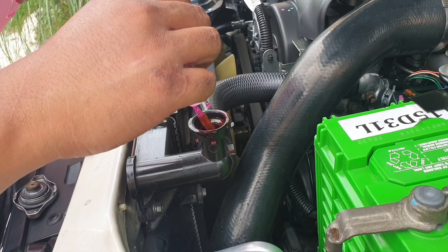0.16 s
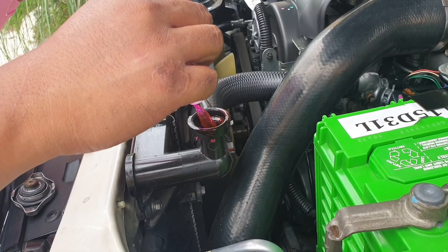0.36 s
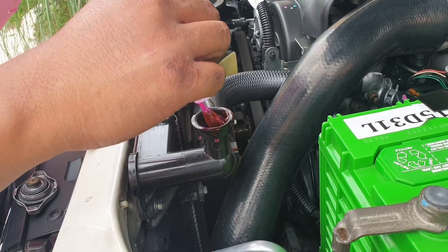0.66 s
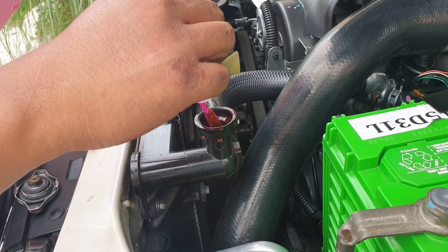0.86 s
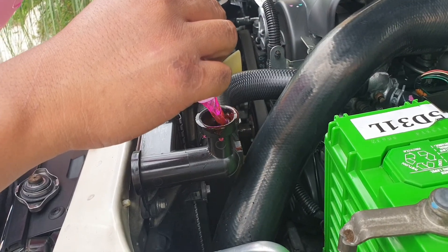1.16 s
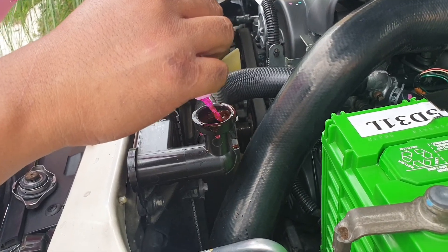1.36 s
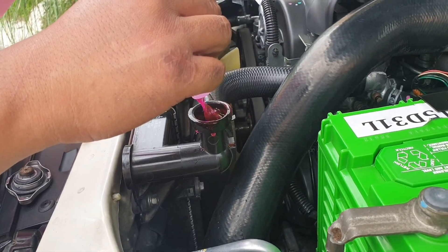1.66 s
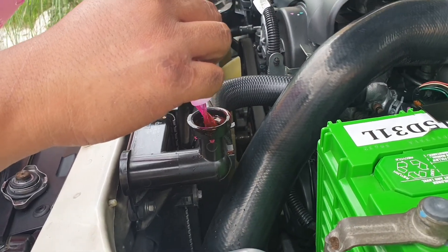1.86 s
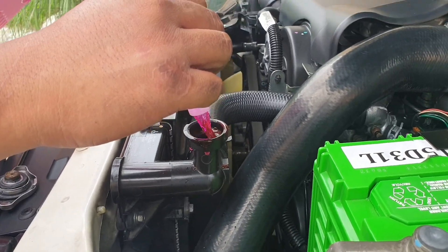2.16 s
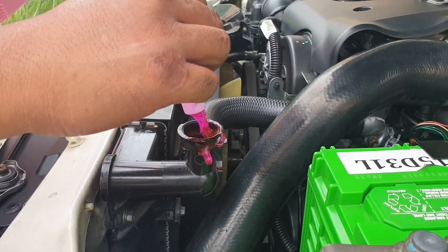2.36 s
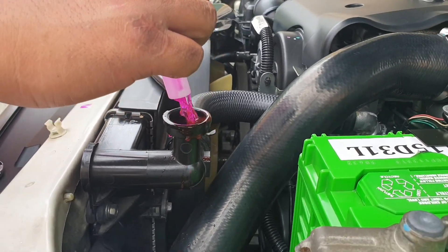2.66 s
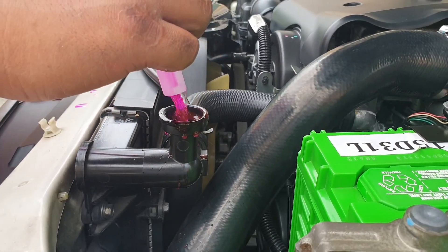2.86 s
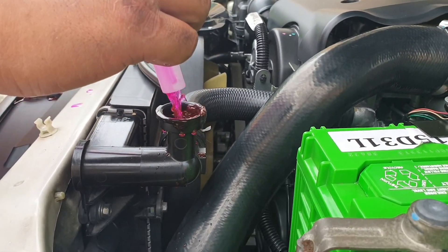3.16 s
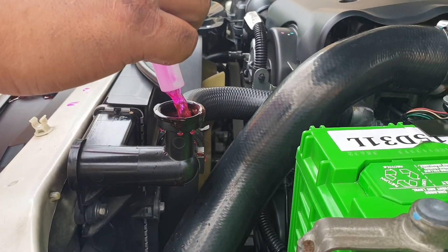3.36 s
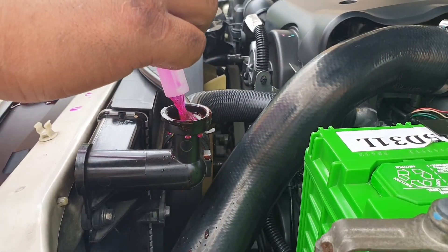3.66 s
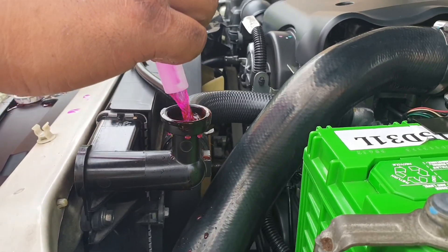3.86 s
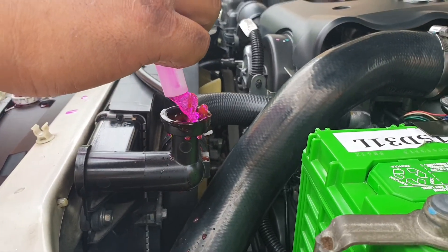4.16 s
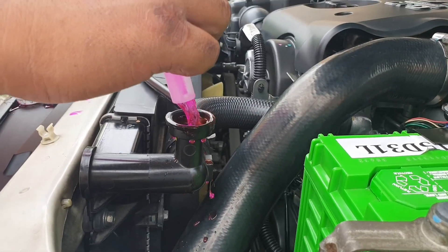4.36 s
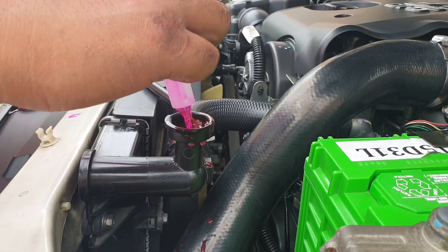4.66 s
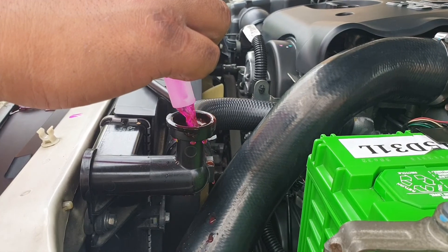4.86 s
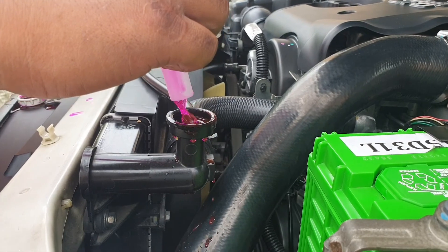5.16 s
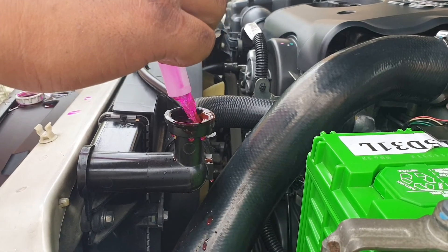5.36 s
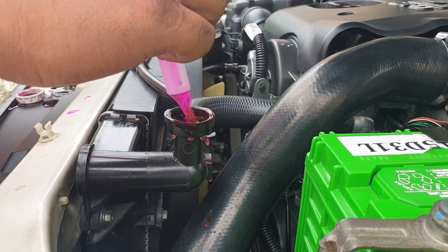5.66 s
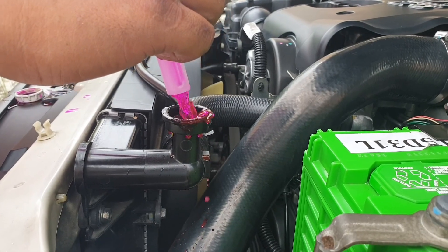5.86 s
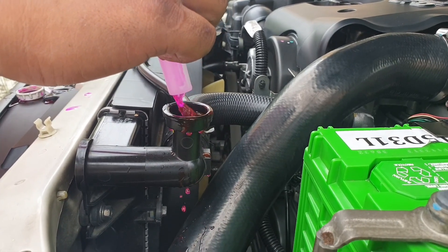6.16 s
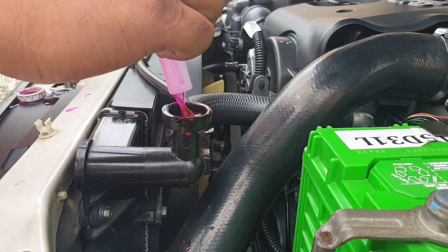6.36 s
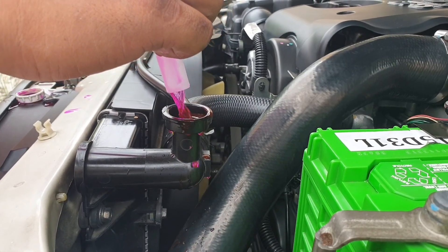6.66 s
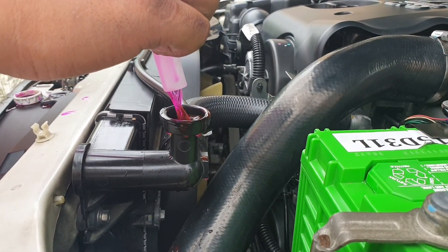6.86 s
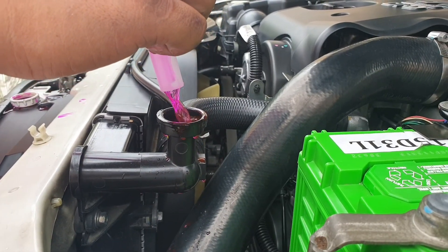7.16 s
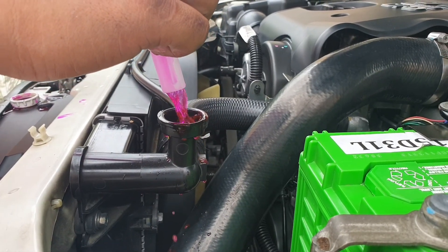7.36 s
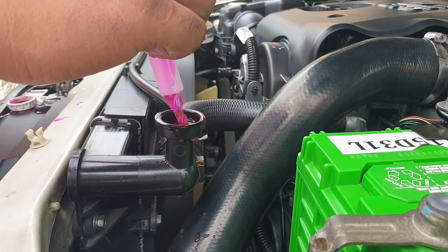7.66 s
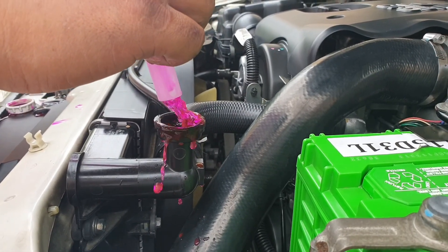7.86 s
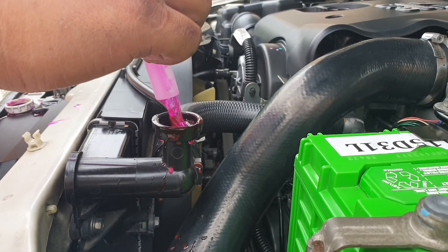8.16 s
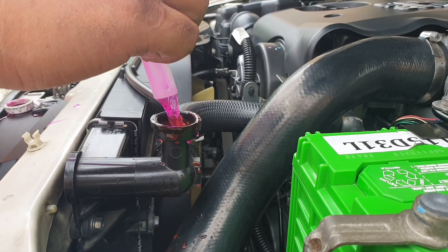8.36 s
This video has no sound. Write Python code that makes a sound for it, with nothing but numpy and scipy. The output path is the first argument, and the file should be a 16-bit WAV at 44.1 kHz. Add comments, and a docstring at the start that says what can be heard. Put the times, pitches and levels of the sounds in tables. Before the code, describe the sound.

A close stereo pour of thin liquid from a plastic jug into a radiator neck, leaning left, brightest there. From 0 s a fizzing hiss with a short burst of low churning; the fizz stays fairly steady to the end at 8.5 s. Irregular hollow gulps thump and ring the jug, strong near 0.8 s, then frequent. At 1.7 s a quick run of bubbles falls in pitch. A tick at 1.9 s and a heavier knock at 2.1 s come at far right. Drops snap brightly near 3.1 s; a low hum passes around 3.5 to 4.9 s. A clear ping and strong hollow gulp come around 5 s. Patter and sharp drops near 6 s lead into clustered gulps and frothy slurping at 6.2 to 6.7 s. Gulps then grow sparser, with crisp drips at 7 to 7.6 s and a last thump and bubbling from 8.2 s. Soft splashes and quiet outdoor rumble throughout.

```python
"""First comes a fizzing hiss with a short burst of churning: coolant runs from a plastic jug into a car radiator.
Noise and swarms of tiny decaying tones make the fizz in the filler neck; lower ones churn inside the jug.
Air gulps back into the jug and rings its hollow, built from dying tones; single drops and bubbles ping.
Soft splashes, a faint hollow hiss and a low outdoor rumble with one passing hum lie under it all, as
shaped noise and a sine. Two knocks sound on the right. The pour is close by and to the left."""
import sys
import numpy as np
from scipy import signal
from scipy.fft import rfft, irfft, next_fast_len
from scipy.io import wavfile

SR = 44100
rng = np.random.default_rng(int(sys.argv[2]) if len(sys.argv) > 2 else 0)


def master(y):
    """Save y as 16-bit WAV."""
    cut = np.clip(np.atleast_2d(y).T, -1, 1)
    pcm = np.round(cut * 32767)  # scale
    wavfile.write(sys.argv[1], SR, pcm.astype(np.int16))


N = 375732
T = np.arange(N) / SR

# strength of the falling stream, before its layers are mixed: (t/s, level/dB)
STREAM_FLOW = [(0.0, -53.5), (2.49, -53.5), (2.82, -50), (3.16, -54), (3.53, -51.5), (3.72, -55),
               (4.39, -52.5), (6.24, -53), (6.64, -54.5), (6.93, -53.5), (8.21, -53.5), (8.52, -50.5)]
# surges of churning in the jug and of froth in the neck:
# (start of full strength t/s, time held t/s, churn level/dB, froth level/dB)
SURGES = [(0, 0.015, -44.5, -65), (0.95, 0.046, -50, -72), (1.734, 0.075, -56, -66),
          (2.75, 0.091, -53, -73), (4.43, 0.18, -59.5, -87), (4.78, 0.23, -54.5, -67),
          (5.16, 0.13, -50, -85), (5.909, 0.017, -56, -57), (6.26, 0.074, -52.5, -62),
          (6.422, 0.03, -49, -55), (6.472, 0.013, -48, -49), (8.38, 0.081, -65, -60.5)]
# air gulping into the jug: (t/s, thump level/dB, hollow ring level/dB,
# brightness = overtone level over the ring/dB, factor on the ringing times)
GULPS = [(0.217, -32, -46, 2.5, 1), (0.558, -33, -48, -2, 0.95), (0.836, -29.5, -32.5, 8, 0.86),
         (1.495, -34.5, -61, 6, 0.85), (1.612, -37, -50.5, -14, 1), (1.707, -33.5, -43.5, 0.5, 0.93),
         (1.997, -32, -44, 0.5, 0.75), (2.342, -30, -54.5, 12, 0.52), (2.745, -33, -49.5, 10, 0.42),
         (3.052, -31, -56, 3, 0.47), (3.254, -30, -53.5, -2, 0.64), (3.39, -31.5, -45.5, 1, 0.96),
         (3.588, -33, -37, -2, 1.04), (4.081, -31.5, -50, 7.5, 0.94), (4.552, -33, -43, -8.5, 0.98),
         (4.78, -34, -66, 11, 0.73), (4.958, -32, -31.5, 0.5, 0.58), (5.144, -34, -67, -4, 1.24),
         (5.398, -33, -41.5, -4, 1), (5.956, -34.5, -70, -4, 0.59), (6.267, -32, -43, 2, 0.8),
         (6.392, -37, -39.5, -8, 1.1), (6.466, -34, -40, 1, 0.63), (6.486, -38, -43, 0, 0.72),
         (6.683, -32, -47, 3, 0.76), (7.387, -31.5, -48.5, -3, 0.74), (7.455, -48, -49.5, -7, 0.76),
         (7.852, -33.5, -49, -0.5, 0.87), (8.223, -28, -47.5, -14, 0.51)]
# tones of the jug's walls, its air, and two sets of overtones, before small random changes:
# (f/Hz, relative level/dB, time to fall by 60 dB at length factor 1 t/s)
WALL_MODES = [(147.7, -5.5, 0.19), (221.2, -2.5, 0.14), (323.6, -9, 0.098), (419.4, -9, 0.083),
              (528, -10.5, 0.035)]
AIR_MODES = [(711.2, 4, 0.16), (820, -12, 0.062)]
OVERTONE_MODES = [(1319, 1.5, 0.093)]
UPPER_MODES = [(1869, 8.5, 0.061), (2360, 3, 0.042), (3120, 2, 0.018), (3970, 6, 0.025)]
# loudest drops smacking into the neck: (t/s, level/dB, starting f/Hz)
SPITS = [(0.2303, -25, 4540), (0.5187, -24, 4760), (0.8757, -29.5, 7500), (1.385, -31.5, 5200),
         (1.837, -30.5, 3100), (2.208, -30.5, 4900), (2.469, -29.5, 4570), (2.8488, -33, 2950),
         (2.876, -30, 5570), (3.097, -26, 6650), (3.1446, -22.5, 6200), (3.347, -28.5, 7150),
         (4.069, -29.5, 6260), (4.231, -33.5, 4070), (4.339, -33.5, 10200), (4.363, -35, 6630),
         (4.456, -32.5, 6840), (4.544, -37, 7650), (4.574, -32.5, 2620), (4.591, -30, 7900),
         (4.637, -34, 7700), (4.651, -27, 6360), (5.337, -29.5, 6600), (5.487, -31.5, 5860),
         (5.6198, -23.5, 3270), (5.701, -32.5, 3080), (5.718, -28, 10000), (5.916, -31.5, 6660),
         (6.199, -20, 3820), (6.264, -32, 2940), (6.3795, -28, 2800), (6.919, -31.5, 4700),
         (7.067, -24, 4870), (7.0933, -26, 6430), (7.189, -24.5, 4850), (7.276, -30, 6500),
         (7.587, -19.5, 5170), (7.793, -26.5, 6360), (8.48, -26, 5100)]
# loudest single bubbles: (t/s, level/dB, starting f/Hz, cycles per ring time,
# rise in pitch as a share per ring time); a ring time is how long the tone takes to fall to 37 %
BUBBLES = [(.412, -41, 750, 7.6, 0.027), (.977, -41.5, 5750, 7.9, 0.013), (1.122, -35.5, 4570, 5.7, 0.035),
           (1.142, -40.5, 680, 2, 0.045), (1.328, -40, 3100, 8.8, 0.026), (1.66, -37, 1970, 1.5, 0.047),
           (1.72, -38, 1110, 2.4, 0.041), (1.746, -41, 3020, 5.9, 0), (1.757, -44, 2150, 8.8, 0),
           (2.439, -37, 3200, 6, 0.02), (2.507, -39, 4720, 9, .01), (2.527, -44, 4700, 11, 0),
           (2.666, -40, 3400, 7.8, 0.0096), (2.732, -37.5, 125, 3.3, .03), (2.788, -37, 240, 2, .05),
           (2.793, -49.5, 1125, 8.1, 0.0024), (2.822, -44, 536, 5.1, 0.12), (2.841, -50, 700, 8.1, 0.045),
           (3.234, -34.5, 87, 1.8, 0.0011), (3.273, -36.5, 3160, 6.2, 0), (3.311, -29.5, 3020, 4.9, .03),
           (3.508, -40, 1570, 4.6, 0.024), (3.554, -40.5, 1250, 2.7, 0.05), (3.921, -34, 4320, 6.1, 0.029),
           (3.965, -29, 5300, 1.9, 0.0048), (4.206, -45.5, 2520, 13, 0), (4.456, -42.5, 2600, 16, 0.0066),
           (4.605, -47, 2520, 22, 0), (4.793, -42, 237, 4.2, 0.053), (4.826, -45, 440, 5, .06),
           (4.862, -43, 846, 3.4, 0.062), (5.02, -33, 4820, 8, 0.031), (5.036, -36.5, 2040, 6.5, .04),
           (5.041, -36, 2620, 9.4, 0.0066), (5.1, -23.5, 3240, 12.7, 0.033), (5.154, -43, 325, 5.6, 0.057),
           (5.2, -41.5, 455, 4.2, .03), (5.216, -36.5, 130, 1.7, 0.023), (5.276, -47, 990, 4, 0.023),
           (5.349, -42, 1770, 4.5, 0.048), (5.47, -43.5, 1800, 5, 0.022), (5.7, -37.5, 1586, 4.9, 0.041),
           (5.893, -39, 1910, 5.2, .04), (6.221, -37, 117, 4.3, 0), (6.299, -37.5, 154, 2.7, 0),
           (6.304, -44.5, 985, 7.7, 0.018), (6.324, -49, 1570, 6.2, .03), (6.342, -41, 620, 4.1, 0.0095),
           (6.399, -44, 2100, 3.7, .03), (6.41, -39, 161, 3.9, 0), (6.427, -45, 810, 7, 0.0082),
           (6.437, -33, 164.6, 3.5, 0), (6.438, -36.5, 321, 4.5, .03), (6.489, -40.5, 1450, 5, 0.043),
           (6.802, -34, 3310, 5.5, 0.01), (7.125, -41, 2940, 7.7, 0.049), (7.268, -37.5, 3290, 13, 0.022),
           (7.283, -44, 2600, 13, 0.0012), (7.979, -40, 2380, 3.8, 0.057), (8.127, -41.5, 2540, 5.8, 0.013),
           (8.183, -51.5, 1730, 15, 0.035), (8.326, -48, 1970, 8, 0), (8.364, -49, 1076, 10.5, 0.063),
           (8.365, -43.5, 1600, 9, 0.0051), (8.384, -39.5, 1280, 4.4, 0.077), (8.387, -39, 1760, 6.2, 0.03),
           (8.388, -39, 2525, 13, 0.021), (8.419, -48, 1540, 8.1, 0.024), (8.427, -46, 2030, 6.4, .04),
           (8.429, -29.5, 4030, 6.2, 0.033), (8.489, -43, 790, 9.2, 0.047), (8.512, -45, 715, 6, 0.075)]
# flurries of small drops: (start of full strength t/s, time held t/s, level/dB)
PATTER = [(2.22, 0.3, -66), (4.2, 0.16, -58.5), (5.88, 0.39, -58)]
# soft splashing, before the shift and sway set below: (t/s, level/dB)
WASH = [(0, -56.5), (.4, -66), (.66, -63), (.95, -61.5), (1.17, -64), (1.3, -66.5), (1.62, -67.5),
        (2.05, -60), (2.18, -61), (2.31, -62.5), (2.55, -67.5), (2.8, -61), (3.2, -68.5), (3.32, -58),
        (3.46, -63.5), (3.65, -54), (4.0, -70), (4.22, -62), (4.5, -70), (4.72, -66), (4.92, -62),
        (5.6, -63.5), (6.0, -64), (6.36, -54), (6.7, -70.5), (6.95, -64.5), (7.02, -65.5), (7.3, -75),
        (7.45, -64), (7.8, -70.5), (8.0, -67.5), (8.28, -64.5), (8.52, -61)]
# the faint hollow hiss comes and goes: (start of full strength t/s, time held t/s, level/dB)
HOLLOW = [(.27, 0.15, -63), (1.08, 0.12, -62), (3.65, 0.23, -63), (6.54, 0.088, -69.5), (7.13, 0.3, -73),
          (8.33, 0.064, -69)]
# outdoor rumble, before its 5.5 dB lift: (t/s, level/dB)
RUMBLE = [(0, -58), (2.6, -57.5), (3.2, -54), (3.5, -57), (4.2, -53.5), (5.6, -58), (7.7, -58.5),
          (7.95, -56.5), (8.52, -56.5)]
# a low hum swells and fades: (start of full strength t/s, time held t/s, level/dB)
DRONE = [(3.68, 0.37, -50)]
# tone colours, the strength of each pitch in a sound: (f/Hz, relative level/dB)
FIZZ_COLOUR = [(900, -19), (2200, -21.5), (2700, -4), (3400, 1), (4300, 1), (5800, -3.5), (6900, 1),
               (8000, -5.5), (10000, -8.5), (11300, -12.5), (12200, -22), (14500, -27)]
NECK_COLOUR = [(2520, -0.5), (3150, 1.5), (3900, -2), (4780, 4), (5950, -6.5), (6650, 5.5), (8500, -12.5)]  # the neck favours a few pitches
CHURN_COLOUR = [(30, -41), (70, 6.5), (140, 4.5), (230, 2), (350, -2), (520, -6.5), (720, -16.5),
                (950, -19.5), (2000, -46), (6000, -77)]
SLURP_COLOUR = [(150, -35), (400, -11), (750, -5), (1400, 4.5), (2600, 6.5), (4000, -8), (8000, -8),
                (13000, -60)]
WASH_COLOUR = [(250, -19), (720, 4.5), (950, -2), (1500, -1.5), (2100, -4.5), (2700, -1), (6000, -45)]
HOLLOW_COLOUR = [(500, -55), (920, 0.5), (1600, -4), (1820, 15.5), (2100, -12), (2550, -12), (2760, 7),
                 (3100, -14), (6000, -67)]
OUTDOOR_COLOUR = [(15, -67), (25, -24), (34, 0), (48, 5), (110, 6), (150, 0.5), (300, -19.5), (450, -21.5),
                  (740, -40.5), (1100, -47), (2000, -68), (4000, -77)]
PORT_COLOUR = [(1100, 0), (1900, -16), (2800, -2.5)]  # for knocks at the right microphone
# how much louder the pour is on the left: (f/Hz, left minus right level/dB)
BALANCE = [(30, 7.5), (120, 5), (250, 7.5), (500, 12), (1300, 12), (2400, 9.5), (3200, 8.5), (4500, 5),
           (5800, 5), (8100, 18), (11500, 6)]

CLUMP_DB = 2  # how much the tinkling comes in flurries
CHURN_DB = -61.5  # steady churning; surges add to it
SURGE_RISE_S, SURGE_FALL_S = 0.043, 0.076
UPPER_DB, UPPER_GROWTH = -16, 1.5  # upper overtones: level under the ring, and dB gained per dB of brightness
SLOSH_DEPTH, SLOSH_PER_S = 0.0067, 55  # random tuning wobble: share of the pitch, new values a second
RING_RISE_PER_S = 0.32  # the ring sharpens as it dies (share of the pitch a second)
GULP_SPLASH_DB, GULP_SPLASH_T60 = -13.5, 0.15  # splash inside the jug: dB against the ring, s to fall 60 dB
TRICKLE_START_S, TRICKLE_LENGTH_S = 1.708, 0.072
TRICKLE_DB, TRICKLE_FIRST_HZ, TRICKLE_LAST_HZ = -44.5, 5540, 2110
WASH_DB, WASH_SWAY_DB = -2.5, 3.5  # shift of the splashing curve, and its random sway
WASH_PER_CHURN_DB, WASH_PER_HISS_DB = -23, -16  # extra splashing against churn surges and hollow hiss
HISS_RISE_S, HISS_FALL_S = 0.025, 0.13
EDGE_HZ = 14650  # upper edge of the sound


def stream():
    """Hiss and a dense fizz of tiny bubbles, with sparser ticks and neck-ringing drops, all follow the flow."""
    hiss = noise(FIZZ_COLOUR, own_share=3.6)
    crackle = swarm(1808, 11750, per_s=700, cycles=4.5, spread_db=3, wet_db=4)
    crackle = unit(colour(crackle, FIZZ_COLOUR))
    tinkle = swarm(2400, 7800, per_s=90, cycles=11, spread_db=2.6, wet_db=-3)
    tinkle = unit(colour(tinkle, NECK_COLOUR))
    tinkle = tinkle * amp(CLUMP_DB * wander(per_s=6.9))
    ticks = swarm(5500, 12000, per_s=22, cycles=1.6, spread_db=4, wet_db=0)
    flow = level(STREAM_FLOW) * amp(1.03 * wander(per_s=11.0))
    return flow * (amp(-2.3) * hiss + amp(-3) * crackle + amp(-7.5) * tinkle + amp(-17) * ticks)


def gurgle():
    """Big slow bubbles churn low inside the jug; froth slurps in the neck when it fills."""
    churn = swarm(110, 1100, per_s=330, cycles=4.5, spread_db=1.5, wet_db=-7)
    churn = unit(colour(churn, CHURN_COLOUR))
    slurp = swarm(583, 5270, per_s=350, cycles=7, spread_db=2, wet_db=-4)
    slurp = unit(colour(slurp, SLURP_COLOUR))
    surge, froth = surging()
    return churn * (amp(CHURN_DB) + surge) + slurp * froth


def surging():
    """Strength of the churning and of the froth as each surge rises, holds and falls."""
    rows = np.array(SURGES)
    churn = swells(rows[:, [0, 1, 2]], SURGE_RISE_S, SURGE_FALL_S)
    froth = swells(rows[:, [0, 1, 3]], SURGE_RISE_S, SURGE_FALL_S)
    return churn, froth


def gulps():
    """Each gulp of air thumps the jug's walls, rings the air inside it, and slops and splashes the liquid."""
    out, slop, splash = np.zeros((2, N)), np.zeros(N), np.zeros(N)
    t = np.arange(SR // 5) / SR
    for s, thump_db, ring_db, bright_db, length in GULPS:
        walls = amp(thump_db) * ring(WALL_MODES, 0.003, length)
        air = amp(ring_db) * ring(AIR_MODES, 0.0012, length)
        air += amp(ring_db + bright_db) * ring(OVERTONE_MODES, 0.004, length)
        upper_db = ring_db + UPPER_DB + UPPER_GROWTH * bright_db
        air += amp(upper_db) * ring(UPPER_MODES, 0.0015, length)
        add(out, s, scatter(walls + air, wet_db=-6.5, t60=0.16))
        # slop follows the thump, splash follows the ring
        add(slop, s, amp(thump_db - 11.5 - 60 * t / 0.15) * (1 - np.exp(-t / 0.0021)))
        add(splash, s, amp(ring_db + GULP_SPLASH_DB - 60 * t / GULP_SPLASH_T60))
    slop_sound = slop * noise(CHURN_COLOUR, own_share=0.92)
    splash_sound = splash * noise(WASH_COLOUR, own_share=0.85)
    return out + slop_sound + splash_sound


def ring(modes, rise_s, length):
    """One blow makes several tones die away; sloshing wobbles their pitch, and each blow varies in strength."""
    t = np.arange(SR // 5) / SR
    tones = np.zeros(len(t))
    for hz, db, t60 in modes:
        strength = amp(db + rng.normal(0, 1.03) - 60 * t / (t60 * length))
        slosh = np.interp(t * SLOSH_PER_S, np.arange(64), rng.standard_normal(64))
        pitch = hz * (rng.normal(1, 0.0057) + RING_RISE_PER_S * t + SLOSH_DEPTH * slosh)
        cycles = np.cumsum(pitch) / SR + rng.random()
        tones += strength * np.sin(2 * np.pi * cycles)
    return tones * (1 - np.exp(-t / rise_s))


def spits():
    """A drop lands with a tick and a very short ping, and the neck rattles it back."""
    out = np.zeros((2, N))
    for s, db, hz in SPITS:
        ping = bubble(hz, cycles=2.85)
        tick = amp(-11.5) * bubble(10000, cycles=1.0)
        add(ping, 0, tick)
        rattled = scatter(ping, wet_db=0, t60=0.03)
        add(out, s, amp(db) * rattled)
    return out


def plinks():
    """The larger bubbles ring, each breaking off a smaller, higher and short-lived one at the same moment."""
    out = np.zeros((2, N))
    for s, db, hz, cycles, rise in BUBBLES:
        large = bubble(hz, cycles, rise)
        small = bubble(1.26 * hz, cycles=0.94)
        add(out, s, amp(db) * scatter(large, wet_db=-5, t60=0.06))
        add(out, s, amp(db - 5) * scatter(small, wet_db=10, t60=0.06))
    return out


def trickle(count=70):
    """The stream slaps the side of the neck: a quick run of bubbles that grow, so the splash falls in pitch."""
    out = np.zeros((2, N))
    for k, (late, spread, size) in enumerate(rng.standard_normal((count, 3))):
        along = (k + .5) / count  # 0 at the start of the run, 1 at its end
        hz = TRICKLE_FIRST_HZ * (TRICKLE_LAST_HZ / TRICKLE_FIRST_HZ) ** along
        hz *= np.exp(.17 * spread)
        swell = np.sin(np.pi * along) ** .5 * amp(TRICKLE_DB + 2 * size)
        s = TRICKLE_START_S + TRICKLE_LENGTH_S * (along + late / count)
        add(out, s, swell * scatter(bubble(hz, cycles=5), wet_db=-2, t60=0.05))
    return out


def patter():
    """Flurries of small drops when the stream frays on the rim of the neck."""
    drops = swarm(2400, 6500, per_s=220, cycles=6, spread_db=2.5, wet_db=-2)
    return drops * swells(PATTER, rise_s=0.04, fall_s=0.06)


def knocks():
    """A tick and a knock right at the right-hand microphone: a sharp snap and push, then a low swing."""
    out, t = np.zeros(N), np.arange(SR // 8) / SR
    snap = bubble(4000, cycles=0.5)
    age = t / 0.0032
    push = (1 - age) * np.exp(-age)
    swing = np.sin(2 * np.pi * 72 * t) * amp(-60 * t / 0.097)
    add(out, 1.935, amp(-18.5) * snap)
    add(out, 1.935, amp(-34.0) * push)
    add(out, 2.1078, amp(-14.5) * snap)
    add(out, 2.1078, amp(-14.5) * push - amp(-26.5) * swing)
    return np.array([np.zeros(N), colour(out, PORT_COLOUR)])


def wash():
    """Soft splashing in the neck is swaying noise that grows with the churn surges and the hollow hiss."""
    churn, _ = surging()
    splash = level(WASH) * amp(WASH_DB + WASH_SWAY_DB * wander(per_s=10))
    splash += amp(WASH_PER_CHURN_DB) * churn
    splash += amp(WASH_PER_HISS_DB) * swells(HOLLOW, HISS_RISE_S, HISS_FALL_S)
    return splash * noise(WASH_COLOUR, own_share=1.0)


def hollow_hiss():
    """A faint hollow hiss comes and goes under the fizz: noise with narrow peaks in its colour."""
    return swells(HOLLOW, HISS_RISE_S, HISS_FALL_S) * noise(HOLLOW_COLOUR, own_share=1.0)


def outdoors():
    """Low open-air rumble, made nearly alike for both ears, with a passing hum of slightly wandering pitch."""
    rumble = amp(5.5) * noise(OUTDOOR_COLOUR, own_share=0.28) * level(RUMBLE)
    hum = unit(np.sin(2 * np.pi * 82 * T + .5 * wander(per_s=1.5)))
    return rumble + hum * swells(DRONE, rise_s=0.2, fall_s=0.84)


def bubble(hz, cycles, rise=0.035):
    """A bubble swells into ringing and dies; its pitch climbs as it nears the surface."""
    samples = np.arange(int(7 * cycles / hz * SR) + 2)
    age = samples * hz / cycles / SR  # in ring times
    envelope = 2 * (1 - np.exp(-3.5 * age)) * np.exp(-age)
    return envelope * np.sin(2 * np.pi * cycles * (age + rise * age ** 2 / 2))


def swarm(low_hz, high_hz, per_s, cycles, spread_db, wet_db, count=70):
    """Bubbles of many pitches start at random times; a few are much louder than the rest."""
    kinds = []
    for hz in np.geomspace(low_hz, high_hz, count):
        one = bubble(hz, cycles * rng.uniform(1.0, 1.09))
        kinds.append(hz * scatter(one, wet_db, t60=0.04))  # higher pitches start out stronger
    out = np.zeros((2, N))
    for when, kind, chance in rng.random((int(per_s * N / SR), 3)).tolist():
        size = max(chance, .02) ** (-spread_db * np.log(10) / 20)
        add(out, when * N / SR, size * kinds[int(kind * count)])
    return unit(out)


def scatter(x, wet_db, t60):
    """A small sound reaches the left microphone first, and echoes off the engine bay by separate paths."""
    t = np.arange(2048) / SR
    tail = rng.standard_normal((2, len(t)))
    tail = tail * (rng.random((2, len(t))) < .15)  # only a few echoes are kept
    tail = tail * (t > .0007) * amp(-60 * t / t60)
    paths = amp(wet_db) * tail / np.linalg.norm(tail, axis=1, keepdims=True)
    paths[[0, 1], [0, 6]] += 1  # direct sound, 6 samples later on the right
    return signal.fftconvolve(x[None], paths, axes=1) / np.sqrt(1 + amp(2 * wet_db))


def noise(points, own_share):
    """Coloured noise for two microphones, partly shared and partly each one's own."""
    shared = rng.standard_normal(N)
    own = rng.standard_normal((2, N))
    return unit(colour(shared + own_share * own, points))


def wander(per_s):
    """Slow random drift with an average (rms) size of 1; per_s sets how fast it moves."""
    t = T[::64]
    smooth = 1 / (1 + (np.fft.rfftfreq(len(t), t[1]) / per_s) ** 4)
    drift = irfft(rfft(rng.standard_normal(len(t))) * smooth, len(t))
    return np.interp(T, t, unit(drift))


def swells(rows, rise_s, fall_s):
    """Gain at every sample from rows of (start t/s, length t/s, level/dB): each rises, holds and falls."""
    t = T[::64]
    gain = np.zeros(len(t))
    for s, length, db in rows:
        corners = [s - rise_s, s, s + length, s + length + fall_s]
        gain += amp(db) * np.interp(t, corners, [0, 1, 1, 0]) ** 2
    return np.interp(T, t, gain)


def level(curve):
    """Gain at every sample from rows of (t/s, level/dB)."""
    return amp(np.interp(T, *np.transpose(curve)))


def colour(x, points):
    """Makes each pitch in x stronger or weaker, following a tone colour in dB."""
    size = next_fast_len(N + SR // 10, True)
    gain = amp(read(points, np.fft.rfftfreq(size, 1 / SR)))
    return irfft(rfft(x, size) * gain, size)[..., :N]


def read(points, hz):
    """Reads a tone colour between its points, on a log-frequency axis."""
    f, value = np.transpose(points)
    return np.interp(np.log(hz + 1), np.log(f + 1), value)


def add(mix, s, sound):
    """Mixes a sound in at time s, cutting off what runs past the end."""
    part = mix[..., max(round(s * SR), 0):][..., :sound.shape[-1]]
    part += sound[..., :part.shape[-1]]


def unit(x):
    """Scales to an average (rms) size of 1."""
    return x / np.sqrt(np.mean(x ** 2) + 1e-20)


def amp(db):
    """Turns decibels into a gain."""
    return 10 ** (np.asarray(db) / 20)


def scene():
    """The pour lies to the left, so the right side is shaded, most of all in the treble near 8 kHz."""
    pour = stream() + gurgle() + gulps() + spits() + plinks() + trickle() + patter()
    sound = pour + wash() + hollow_hiss() + outdoors()
    hz, tilt_db = np.transpose(BALANCE)
    left_db = 20 * np.log10(2 / (1 + amp(-tilt_db)))  # the two gains add up to 2
    left = colour(sound[0], np.c_[hz, left_db])
    right = colour(sound[1], np.c_[hz, left_db - tilt_db])
    return np.array([left, right]) + knocks()  # the knocks are not shaded


def record(dry):
    """A steep low-pass filter takes away the highest treble."""
    lowpass = signal.firwin(401, EDGE_HZ, window=("kaiser", 8), fs=SR)
    return signal.oaconvolve(dry, lowpass[None], "same")


dry = scene()
out = record(dry)
master(out)
```